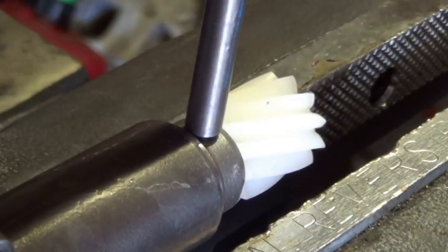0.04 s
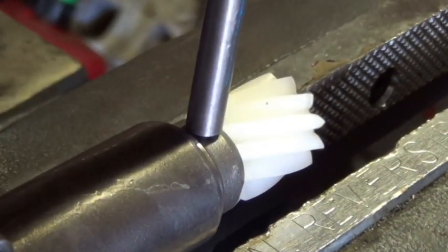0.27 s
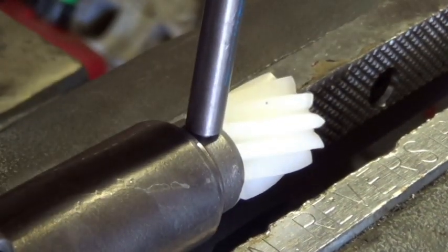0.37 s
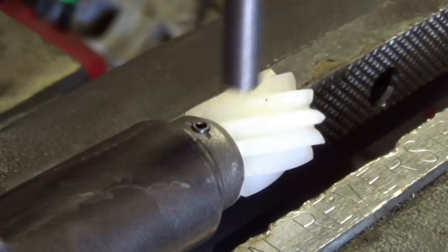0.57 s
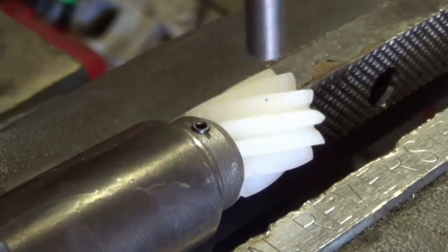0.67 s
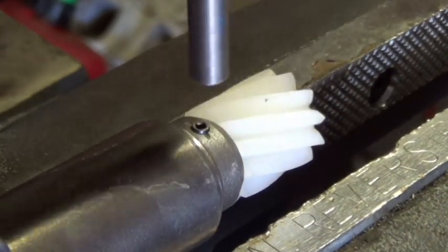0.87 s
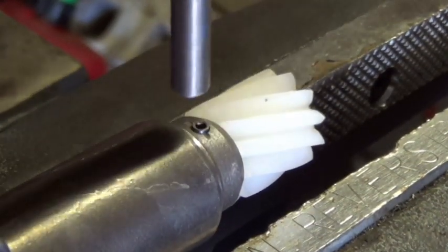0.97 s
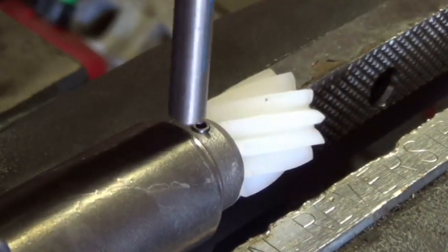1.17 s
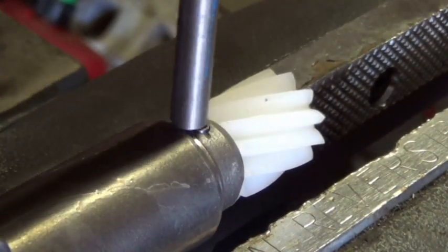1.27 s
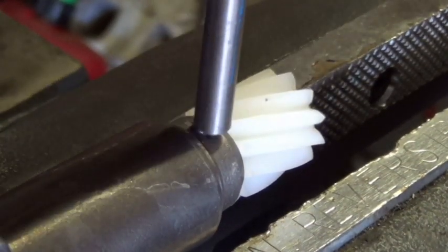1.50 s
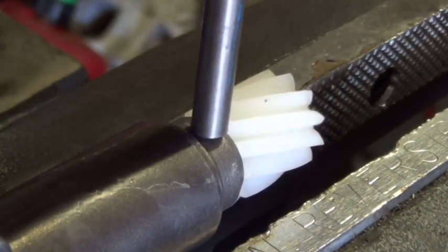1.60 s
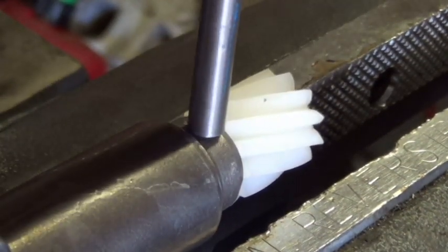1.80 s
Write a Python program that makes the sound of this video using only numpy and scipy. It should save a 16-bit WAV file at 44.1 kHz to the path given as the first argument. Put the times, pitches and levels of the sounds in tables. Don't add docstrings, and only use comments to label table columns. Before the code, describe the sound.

Single loud hammer blow on a steel punch held on a shaft, vise and bench shuddering after it, then a small hammer bounce and two soft metal set-downs, heard close in stereo over low room hum.

```python
import sys
import numpy as np
from scipy import signal
from scipy.fft import rfft, irfft
from scipy.io import wavfile
from scipy.ndimage import uniform_filter1d

SR = 44100
rng = np.random.default_rng(int(sys.argv[2]) if len(sys.argv) > 2 else 0)


def store_wav(level_fs):
    pcm = np.round(np.clip(np.atleast_2d(level_fs), -1, 1) * 32767)
    wavfile.write(sys.argv[1], SR, pcm.T.astype(np.int16))


def decibels_to_gain(level_db):
    exponent = np.asarray(level_db, float) / 20
    return 10 ** exponent


N = 81585

# start in seconds, level in dB.
BLOW = [
    (0.2094, -8.5),
    (0.2130, -12.5),
    (.2150, -14.5),
    (0.2208, -16),
    (.2260, -20),
    (0.246, -20.5),
    (.2540, -17.5),
    (.2760, -29.5),
]
# frequency in Hz, ratio in dB.
SPREAD = [(60, -32), (250, -20), (600, -8), (2500, -9), (5000, -10), (10000, -18)]
LIGHT_WAVER_DB, STRONG_WAVER_DB = 1.5, 3


def at(table, hz):
    a = np.array(table, float)
    return np.interp(np.log(hz), np.log(a[:, 0]), a[:, 1])


def colour(x, table):
    hz = np.maximum(np.fft.rfftfreq(2048, 1 / SR), 20)
    cepstrum = irfft(np.log(decibels_to_gain(at(table, hz))))
    cepstrum[1:1024] *= 2
    cepstrum[1025:] = 0
    h = irfft(np.exp(rfft(cepstrum)))[:1024]
    h = h / np.sqrt(np.sum(h ** 2))
    return signal.fftconvolve(x, h[None], axes=1)[:, :N]


def bands():
    f = np.fft.rfftfreq(N, 1 / SR) + 1
    for hz in 25 * 2 ** np.arange(0, 9.5, 1 / 3):
        u = np.clip(3 * np.log2(f / hz), -1, 1)
        spectrum = rfft(rng.standard_normal((2, N))) * np.cos(u * np.pi / 2)
        mid, side = irfft(spectrum, N)
        yield hz, mid, side


def pair(mid, side):
    return np.array([mid + side, mid - side])


def walk(rate_hz):
    k = int(SR / rate_hz)
    held = np.repeat(rng.standard_normal(N // k + 1), k)
    return 0.94 * uniform_filter1d(held, k)[:N]


def since(start_s):
    t = np.arange(N) / SR - start_s
    return np.maximum(t, 0), t >= 0


def fade(t, t60_s):
    return decibels_to_gain(-60 * t / max(t60_s, .005))


def rows(pitches, table):
    return [(hz, *row) for hz, row in zip(pitches, table)]


def modes(start_s, table, rise_s=0.00025, scatter_db=0., waver_db=LIGHT_WAVER_DB):
    t, on = since(start_s)
    out, draws = 0, rng.standard_normal((len(table), 3))
    for (hz, db, t60_s), (turn, lean, scatter) in zip(table, draws):
        phase = 2 * np.pi * hz * t + 2 * turn
        level_db = db + scatter_db * scatter + waver_db * walk(25 + hz / 100)
        env = decibels_to_gain(level_db) * fade(t, t60_s)
        side = 0.41 * lean * decibels_to_gain(at(SPREAD, hz)) * env * np.cos(phase)
        out = out + pair(env * np.sin(phase), side)
    return out * on * (1 - np.exp(-t / rise_s))


def crack(start_s, db, decay_s):
    t, on = since(start_s)
    mid, side = rng.standard_normal((2, N))
    return decibels_to_gain(db) * on * np.exp(-t / decay_s) * pair(mid, 0.31 * uniform_filter1d(side, size=3))


def workshop():
    # frequency in Hz, density in dB per Hz.
    floor = [(15, -56), (25, -25.5), (43, -16), (117, -5), (270, -14), (516, -15.5), (1440, -26.5),
             (14400, -37), (16000, -34.5)]
    # frequency in Hz, rms level in dB.
    tones = [(58, -73), (15736, -79.5)]
    # time in seconds, rms level in dB.
    hum = [(0.0, -66), (0.066, -63), (0.354, -78), (0.376, -75), (0.86, -67), (1.2, -73), (1.746, -59.5),
           (1.85, -65.5)]
    floor_db, floor_spread_db = -61, 3.5
    duck_db, duck_s, hum_hz = -3, 0.067, 117
    out, t = 0, np.arange(N) / SR
    for hz, mid, side in bands():
        db = at(floor, hz) + 1.0 * walk(14)
        out = out + decibels_to_gain(db) * pair(mid, decibels_to_gain(at(SPREAD, hz) + floor_spread_db) * side)
    after, on = since(BLOW[0][0])
    duck = duck_db * on * np.exp(-(after / duck_s) ** 2)
    out = out * decibels_to_gain(floor_db - 2 + duck) / np.std(out)
    hum_db = np.interp(t, *np.array(hum).T) - 1.5
    for hz, db in [*tones, (hum_hz, hum_db)]:
        drift_s = np.cumsum(.012 * walk(6)) / SR * (hz < 1000)
        tone = np.sin(2 * np.pi * hz * (t + drift_s))
        out = out + np.sqrt(2) * decibels_to_gain(db + 1.5 * walk(15)) * tone
    return out


def shudder():
    # frequency in Hz, density in dB per Hz.
    shudder_colour = [(60, -31.5), (150, -10.5), (433, -0.5), (1000, -4.5), (1830, -1.5), (4000, -5.5),
                      (10000, -10.5), (16000, -27)]
    # frequency in Hz, t60 in seconds.
    shudder_t60 = [(150, 0.36), (500, 0.27), (1500, 0.3), (4000, 0.3), (8000, 0.24), (15000, 0.23)]
    # frequency in Hz, swell time in seconds.
    shudder_swell = [(200, 0.031), (1500, 0.024), (5000, 0.026), (12000, 0.0022)]
    shudder_db, late_db, late_t60_s, rattle_db = -26.5, -35, 1.3, -0.5
    t, _ = since(BLOW[0][0])
    out, rattle = 0, walk(250)
    for hz, mid, side in bands():
        swell = (1 - np.exp(-t / max(at(shudder_swell, hz), .001))) ** 2
        env = swell * (fade(t, at(shudder_t60, hz)) + decibels_to_gain(late_db) * fade(t, late_t60_s))
        gain = decibels_to_gain(at(shudder_colour, hz) + rattle_db * rattle)
        out = out + gain * env * pair(mid, decibels_to_gain(at(SPREAD, hz)) * side)
    return out * decibels_to_gain(shudder_db) / np.std(out[:, int(.24 * SR):int(.3 * SR)])


def ticks(events, body, tail_colour, click_db=0):
    # frequency in Hz, density in dB per Hz.
    bright_colour = [(2000, -28), (4500, -5.5), (6500, -1), (10500, 0.5), (13000, -5), (16000, -21)]
    # frequency in Hz, density in dB per Hz.
    dull_colour = [(200, -17), (1000, -8), (3000, -0.5), (5000, -3.5), (8000, -22.5)]
    thud_top_hz, body_db, tick_s = 4000, -4, .0012
    tail_gain_db, tail_t60_s, late_db, late_t60_s = -13, 0.16, -12.5, 0.5
    bright = dull = tail = out = 0
    for s, db, thud_db in events:
        bright = bright + crack(s, db + click_db / 2, tick_s)
        dull = dull + crack(s, db + thud_db + click_db - 1, tick_s)
        tail_db = db + thud_db + tail_gain_db
        tail = tail + crack(s, tail_db, tail_t60_s / np.log(1000))
        tail = tail + crack(s, tail_db + late_db, late_t60_s / np.log(1000))
        ring = [(hz, g + thud_db * (hz < thud_top_hz), t60_s) for hz, g, t60_s in body]
        out = out + decibels_to_gain(db + body_db) * modes(s, ring)
    return out + colour(bright, bright_colour) + colour(dull, dull_colour) + colour(tail, tail_colour)


def punch_tip():
    # start in seconds, level in dB, thud in dB.
    set_a = [
        (1.2824, -44, 1.5),
        (1.2846, -44.5, 2.5),
        (1.2868, -42.5, -2.5),
        (1.2905, -50, 5.5),
        (1.2930, -52.5, 7.5),
    ]
    # start in seconds, level in dB, thud in dB.
    settle = [
        (1.3290, -68, 1),
        (1.3330, -57, 6.5),
        (1.3360, -63.5, 11),
        (1.3440, -58, 8),
        (1.3480, -64.5, 12),
        (1.3530, -70, 11.5),
    ]
    # start in seconds, level in dB, thud in dB.
    set_b = [
        (1.6106, -39, 1.5),
        (1.6120, -44.5, -2.5),
        (1.6152, -41.5, -16),
        (1.6205, -60, 1),
        (1.6262, -43.5, -11),
        (1.6274, -41, -12),
    ]
    # frequency in Hz, level in dB, t60 in seconds.
    set_a_body = [(495, -4, .08), (867, -5, .14), (1140, -12, .06), (1950, -10, .04), (2580, -8, .06),
                  (2870, -6, .06), (7060, -14, .02), (11400, -8, .012)]
    settle_body = [(372, -1, .18), (420, -14, 1.0), (454, -3, .12), (870, -9, .8), (1140, -3, .08),
                   (10600, 1, .025), (11300, 1, .015)]
    set_b_body = [(511, -11, .09), (1530, -13, .08), (2200, -10, .11), (2580, -1, .025), (3200, 1, .025),
                  (6960, -9, .015), (9150, -8, .015), (11200, -6, .012)]
    # frequency in Hz, density in dB per Hz.
    set_tail = [(88, -33), (200, -6.5), (380, 4.5), (600, 3.5), (900, 0), (2200, 0.5), (5000, -11.5),
                (16000, -28)]
    out = ticks(set_a, set_a_body, set_tail)
    out = out + ticks(settle, settle_body, set_tail, click_db=-7)
    return out + ticks(set_b, set_b_body, set_tail)


def hammer_drop():
    # start in seconds, level in dB, thud in dB.
    graze = [
        (.4972, -47, -20),
        (.5000, -50, -20),
        (.5020, -54, -20),
    ]
    # start in seconds, level in dB, thud in dB.
    drop_events = [
        (.5444, -32.5, -2),
        (.5462, -38.5, -10),
        (.5492, -35.5, -7),
        (.5518, -35, -25),
        (.5535, -35.5, -14),
        (.5560, -46, -8),
    ]
    # frequency in Hz, level in dB, t60 in seconds.
    graze_body = [(7100, -2, .03), (9000, -10, .02), (11500, -10, .02)]
    drop_body = [(1140, -6, .11), (1350, -3, .05), (1530, 2, .08), (1700, -1, .05), (2590, -8, .15),
                 (6420, -11, .04), (9300, -3, .02), (11500, -3, .012)]
    # frequency in Hz, density in dB per Hz.
    drop_tail = [(88, -42), (300, -2), (900, -9), (1500, 2), (3000, -9), (9000, -23), (16000, -30)]
    return ticks(graze, graze_body, drop_tail) + ticks(drop_events, drop_body, drop_tail)


def blow_cracks():
    # frequency in Hz, density in dB per Hz.
    crack_colour = [(88, -50.5), (300, -28.5), (1000, -16.5), (1830, -9), (2450, -13.5), (4400, -4.5),
                    (6500, -11), (11000, -2), (16000, -11.5)]
    # frequency in Hz, density in dB per Hz.
    click_colour = [(200, -23.5), (1000, -5), (3000, -3.5), (7000, -7), (12000, -2.5), (14000, -15),
                    (16000, -22.5)]
    crack_s, rebound_db = 0.001, -1
    strike = crack(*BLOW[0], crack_s)
    rebounds = sum(crack(s, db + rebound_db, crack_s) for s, db in BLOW[1:])
    return colour(strike, crack_colour) + colour(rebounds, click_colour)


def singing_steel():
    head_hz = [4764, 6417, 6512, 7219, 7391, 9486, 9569, 9656, 9815, 10297, 10835, 10938, 11457, 11836]
    # level in dB, t60 in seconds.
    head = [(-12, .06), (-14, .08), (-12, .1), (-11, .1), (-14, .08), (-7, .06), (-8, .08), (-10, .06),
            (-9, .08), (-12, .06), (-11, .12), (-12, .1), (-10, .1), (-9, .03)]
    # start in seconds, frequency in Hz, level in dB, t60 in seconds.
    pings = [(.2096, 6200, -22.5, 0.036), (0.2094, 12200, -15.5, 0.015), (.2125, 9530, -14.5, .02),
             (.2150, 9590, -16.5, 0.027), (.2210, 10970, -16.5, .03), (0.2248, 9430, -21, .05),
             (.2350, 6150, -30, 0.034), (.2540, 6400, -26, .045), (0.2543, 10120, -22, .04),
             (.2610, 1851, -23, .08), (0.273, 6200, -30.5, 0.037), (.2760, 9800, -29, .04),
             (0.261, 10870, -31.5, 0.22)]
    out, partials, head_db = 0, rows(head_hz, head), -23.5
    for s, db in BLOW:
        ring = modes(s, partials, scatter_db=3, waver_db=STRONG_WAVER_DB)
        out = out + decibels_to_gain(db - BLOW[0][1] + head_db) * ring
    return out + sum(modes(s, [(hz, db, t60_s)], waver_db=2.5) for s, hz, db, t60_s in pings)


def bench_and_free_steel():
    bench_hz = [70, 50, 306, 365, 441, 517, 870, 1140, 1511, 1860, 1897, 2230, 3032, 3374]
    # level in dB, t60 in seconds.
    bench = [(-11.5, 0.36), (-15.5, 0.45), (-0.5, 0.329), (-6, 0.3), (-2, 0.3), (-2.5, .3), (-11, 0.61),
             (-10, 0.39), (1, .3), (-2, 0.3), (1, 0.42), (-4.5, 0.12), (-7, 0.2927), (-8, .45)]
    ring_hz = [2412, 2401.8, 3774, 4048, 4554, 4910, 5435, 6471, 6788, 7965, 8086, 8904, 11610, 12020]
    # level in dB, t60 in seconds.
    ring = [(11, 0.77), (11, 0.9), (-4.5, 1.6), (-5, 1.2), (-5.5, 2.6), (-7.5, 1.1), (-12.5, 2.7), (4, 1.1),
            (2.5, 1.0), (-1, 1.3), (-3, 0.87), (-2.5, 1), (-5, 0.92), (-6, .8)]
    s, bench_db, ring_db = BLOW[0][0], -27.5, -56
    bench_sound = modes(s, rows(bench_hz, bench), rise_s=0.038, waver_db=STRONG_WAVER_DB)
    ring_sound = modes(s, rows(ring_hz, ring), rise_s=0.046)
    return decibels_to_gain(bench_db) * bench_sound + decibels_to_gain(ring_db) * ring_sound


def blow():
    return blow_cracks() + singing_steel() + bench_and_free_steel()


def scene():
    return workshop() + shudder() + punch_tip() + hammer_drop() + blow()


def low_pass(x):
    return signal.sosfilt(signal.butter(12, 16620, fs=SR, output="sos"), x)


def record(dry):
    # frequency in Hz, difference in dB.
    port_lean = [(60, 0), (125, 1.5), (250, 3.8), (500, 5), (1000, 2.4), (2500, 1.2), (10000, 1)]
    top_hz = 16300
    f = np.fft.rfftfreq(N, 1 / SR) + 1
    lean = decibels_to_gain(at(port_lean, f) / 2)
    top = np.clip((top_hz - f) / 400, 0, 1)
    mix = irfft(rfft(dry) * top * np.array([lean, 1 / lean]), N)
    return low_pass(mix)


dry = scene()
out = record(dry)
store_wav(out)
```